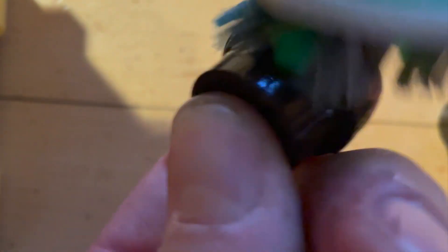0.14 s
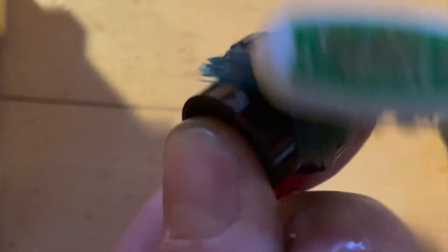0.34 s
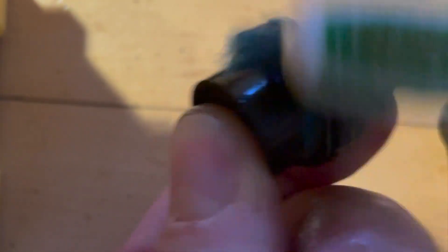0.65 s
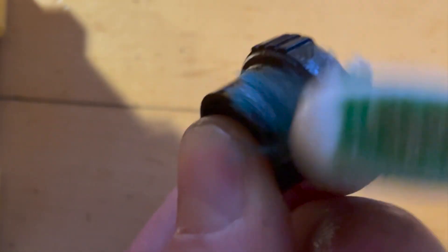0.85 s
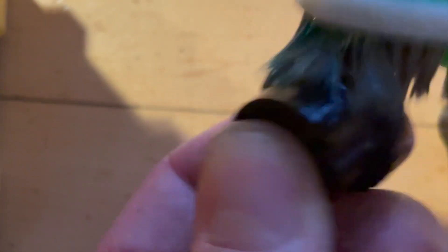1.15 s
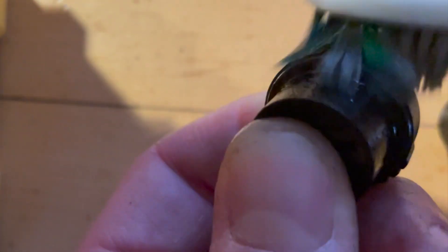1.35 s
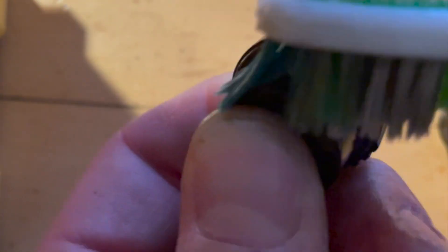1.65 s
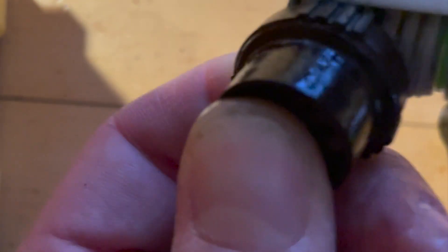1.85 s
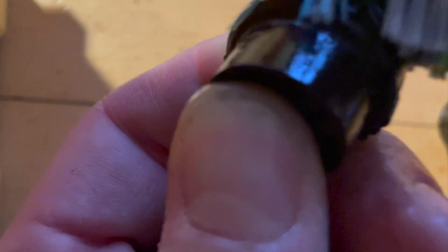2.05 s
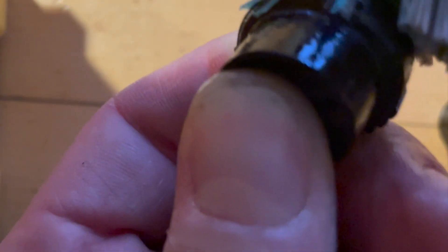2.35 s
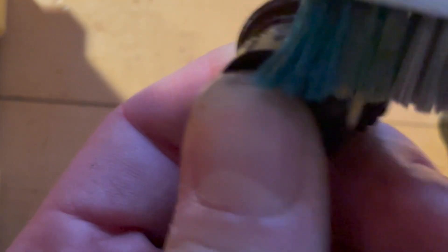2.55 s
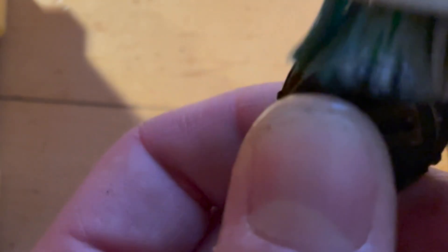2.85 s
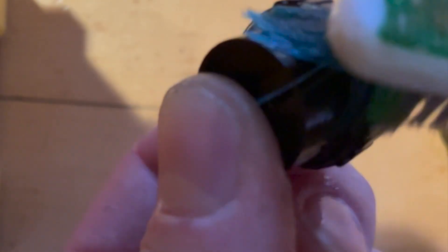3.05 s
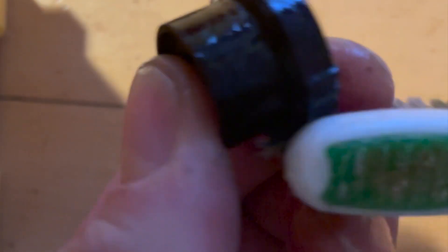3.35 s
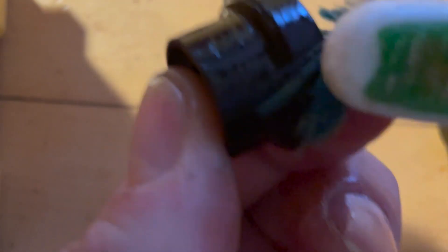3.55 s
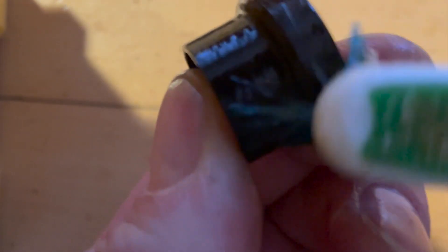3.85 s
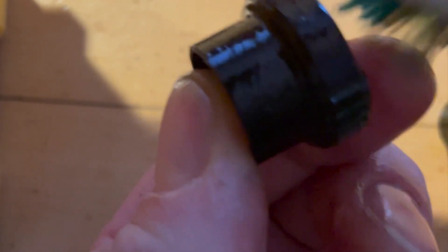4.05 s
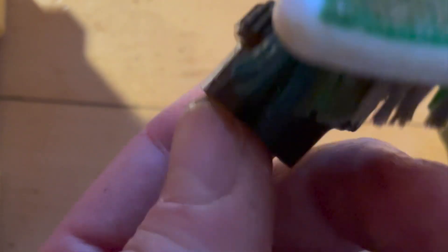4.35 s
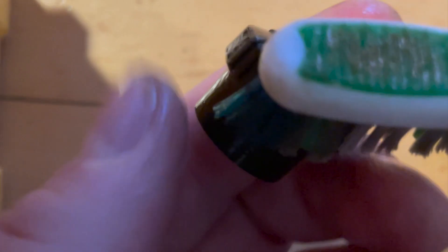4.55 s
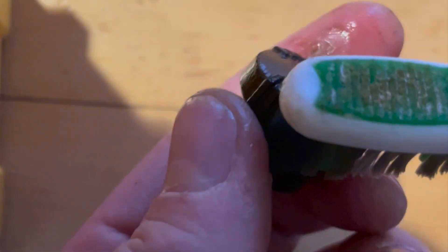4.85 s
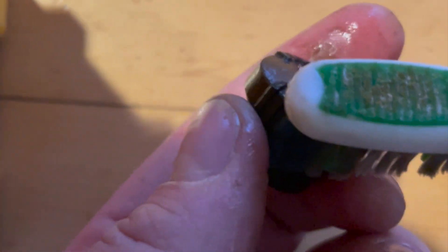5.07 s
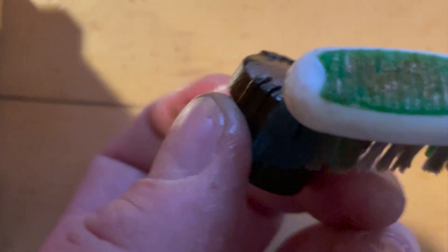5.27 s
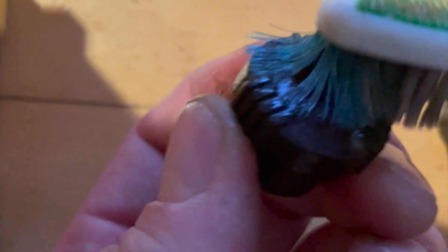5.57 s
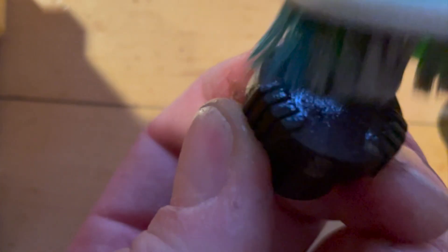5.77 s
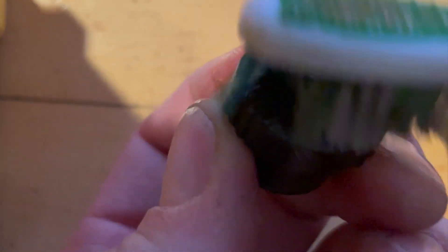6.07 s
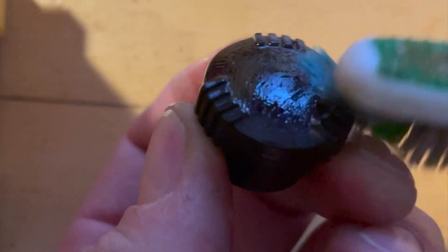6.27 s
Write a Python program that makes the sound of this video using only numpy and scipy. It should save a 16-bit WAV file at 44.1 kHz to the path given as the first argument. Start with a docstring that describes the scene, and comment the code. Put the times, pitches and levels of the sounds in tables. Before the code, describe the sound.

Close, dry scrubbing of a small wet plastic knob with an old toothbrush, in a quiet indoor room with faint low electric hum. From 0 to 0.8 s quick strokes of roughly a tenth of a second follow one another, fizzy and raspy. From 0.8 to 1.7 s they are hardest and brightest, with sharp bristle snaps and small knocks. Around 1.7-2.4 s a grip shift rumbles and strokes become short, separate flicks. From 2.4 to 3.1 s fuller scrubbing returns, strongest near 2.8 s. Crisp ticks and loud snaps come at 3.2-3.35 s, then lighter, sparser scratches, with a softer swish near 4 s. From 4.2 to 5.2 s brushing almost vanishes; fingers roll the knob with dull bumps at 4.5, 4.95 and 5.25 s. From 5.3 s steady strokes resume, with a sharp snap near 5.47 s, longer sweeps after 6 s and a last snap at 6.3 s.

```python
"""Indoors at a workbench: an old toothbrush scrubs a small wet plastic knob held in the fingers, heard close.
In each stroke bristles stick and flick free: coloured random flicks make the fizz of the tips and the knob's rasp.
Short bursts and rings make tufts tick and snap over its ridges; damped low noise makes the hands rumble.
Brief low wave packets are bumps and knocks; wavering sines and soft noise are a faint electric hum and room air."""
import sys
import numpy as np
from scipy import signal
from scipy.fft import rfft, irfft, next_fast_len
from scipy.io import wavfile
from scipy.ndimage import uniform_filter1d

SR = 44100
rng = np.random.default_rng(int(sys.argv[2]) if len(sys.argv) > 2 else 0)


def bounce(signal):
    """Save signal as a 16-bit WAV file at the path given by the first command-line argument."""
    frames = np.transpose(np.atleast_2d(signal))
    limited = np.clip(frames, -1, 1)
    pcm = np.round(limited * 32767).astype(np.int16)
    wavfile.write(sys.argv[1], SR, pcm)


N = 282681

# Brush strokes. Each row: start in seconds, length in seconds, hardest moment as a share of the length (0-1),
# fizz of the bristle tips in dB before trim, rasp of the knob in dB before trim.
STROKES = [(0, 0.097, 0.8, -40, -41.5), (0.101, 0.14, 0.88, -38, -40.5), (0.269, 0.075, 0.28, -43.5, -41.5),
           (0.348, 0.037, 0.6, -44.0, -44), (0.427, 0.12, 0.81, -40, -40.5), (0.582, 0.11, 0.79, -37, -37),
           (0.722, 0.095, 0.6, -38.5, -41.5), (0.844, 0.071, 0.66, -34, -34.5),
           (0.949, 0.096, 0.52, -35.5, -39), (1.073, 0.091, 0.77, -35.0, -37.5),
           (1.175, 0.1, 0.36, -34.5, -37.5), (1.303, 0.054, 0.5, -30.0, -34),
           (1.391, 0.076, 0.5, -32, -38.0), (1.496, 0.06, 0.6, -31, -35), (1.594, 0.051, 0.1, -31.5, -36.5),
           (1.667, 0.127, 0.15, -35.5, -38.0), (1.775, 0.053, 1, -48, -48.5), (1.972, 0.049, 0, -35, -40),
           (2.045, 0.051, 0.95, -45.5, -50), (2.127, 0.049, 0.75, -43, -49),
           (2.315, 0.043, 0.97, -44, -50.5), (2.406, 0.073, 0.51, -35, -38.5),
           (2.477, 0.09, 0.39, -42, -43), (2.567, 0.086, 0.82, -37, -40.5), (2.673, 0.13, 0.39, -39.0, -42),
           (2.801, 0.067, 0.67, -31.5, -37), (2.882, 0.11, 0.23, -39.5, -42),
           (2.993, 0.096, 0.18, -44.5, -51), (3.092, 0.086, 0.9, -50.5, -50),
           (3.176, 0.095, 0.29, -36.5, -37), (3.306, 0.026, 0.96, -36.5, -34.5),
           (3.374, 0.045, 0.53, -48.5, -53), (3.451, 0.041, 0.62, -38, -43),
           (3.517, 0.019, 0.92, -41.5, -40), (3.593, 0.048, 0.13, -42.5, -47.5),
           (3.658, 0.064, 0.2, -58.5, -62.0), (3.778, 0.1, 0.35, -47.5, -49.5),
           (3.913, 0.14, 0.61, -38, -42.5), (4.141, 0.091, 0.35, -49, -45.5), (4.261, 0.09, 0.6, -58, -57),
           (4.377, 0.12, 0.33, -55.5, -55.5), (4.532, 0.116, 1, -62.5, -71.0),
           (4.732, 0.09, 0.7, -63.5, -64), (5.111, 0.051, 0.74, -54.5, -58), (5.309, 0.034, 0.65, -47, -49),
           (5.363, 0.12, 0.92, -38.5, -41), (5.511, 0.063, 0.04, -41.5, -45.5),
           (5.578, 0.12, 0.62, -40.5, -42.5), (5.73, 0.12, 0.52, -33.5, -37.5),
           (5.884, 0.054, 1, -39, -39.5), (5.93, 0.13, 0.6, -41.5, -42), (6.058, 0.19, 0.54, -37, -39),
           (6.238, 0.18, 0, -38, -40)]
# Tufts snapping over a ridge. Each row: time in seconds before a common delay, peak in dB before trim,
# clack of the knob relative to the peak in dB before trim, ring likewise in dB before trim.
SNAPS = [(0.3882, -31, -18, -18), (0.5265, -41, -26, -21), (0.6513, -21, -15, -6), (0.6777, -21, -21, -31),
         (0.706, -25, -10.5, -33), (0.8517, -19, -27, -15), (0.9197, -18.5, -11, -18),
         (0.9486, -22, -14, -9), (1.1063, -16, -36, -15), (1.2158, -15.5, -19, -19),
         (1.3119, -11.5, -32, -24), (1.4178, -12, -16, -38), (1.5324, -18.5, -39, -11),
         (1.593, -20, -30, -19), (1.6837, -17, -34, -14), (1.7866, -19.5, -5, -8), (1.9736, -27, -25, -27),
         (1.9918, -15, -26, -41), (2.1948, -20, -19.5, -21), (2.2662, -27.5, -29, -24),
         (2.304, -21, -38, -26), (2.353, -22, -31, -16), (2.377, -29, -25, -26), (2.4248, -22, -12.5, -18),
         (2.509, -20, -19.5, -18), (2.634, -16.5, -25, -9.5), (2.7507, -22, -21, -9), (2.83, -25, -28, -12),
         (2.861, -20, -30, -5), (3.1831, -22, -32, -23), (3.2096, -16, -20.5, -22),
         (3.3123, -15, -23, -3.5), (3.3296, -10.5, -29, -18), (3.4797, -28, -34, -5),
         (3.5308, -26, -19, -17), (3.5788, -31, -27, -10), (4.126, -31.5, -16, -10),
         (4.1832, -20.5, -18.5, -24), (4.2151, -27, -19, -27), (4.2704, -46.5, -1.5, -20),
         (4.3264, -26.5, -24, -35), (4.4155, -31, -32, -35), (4.546, -38, -14, -12), (4.963, -51.5, -1, 6),
         (5.4661, -11, -24.5, -18), (5.8373, -19.5, -13.5, -8), (5.9125, -18, -25, -18),
         (6.3006, -13, -34, -16)]
# Bumps and knocks of brush and fingers on the knob. Each row: centre in seconds, peak in dB before trim,
# pitch in Hz, length in seconds.
BUMPS = [(0.656, -28.5, 410, 0.0017), (.897, -31.5, 129, 0.01), (1.113, -32, 170, .0097),
         (1.229, -29.5, 330, .006), (1.336, -33.5, 726, 0.0013), (1.345, -33.5, 198, 0.0075),
         (1.42, -29.5, 230, 0.0075), (1.598, -33.5, 556, 0.0031), (1.603, -26, 200, 0.0033),
         (1.79, -34, 1530, 0.00049), (1.791, -31, 168, 0.0081), (2.833, -29, 660, 0.00068),
         (3.335, -25, 139, 0.0062), (4.499, -39, 1440, 0.0011), (4.503, -28.5, 480, 0.0021),
         (4.512, -34, 79, 0.015), (4.948, -26.5, 180, 0.0087), (4.966, -36.5, 1700, 0.00032),
         (5.253, -23, 150, 0.011), (5.332, -31, 514, 0.0012)]
# Fingers shifting grip and rolling the knob. Each row: peak time in seconds, rumble in dB, fading time in seconds.
GRIPS = [(1.691, -32, 0.042), (2.01, -38, 0.021), (4.06, -43.5, 0.25), (4.51, -38, 0.046),
         (4.68, -45, 0.026), (4.95, -40, 0.28), (5.249, -32.5, 0.032), (5.32, -41, 0.046),
         (5.48, -38.5, 0.016), (5.56, -38.5, 0.027), (5.68, -37, 0.042), (5.85, -42, 0.026),
         (5.99, -43, 0.018)]
# Work on the ridges. Each row: time in seconds, ticks relative to the rasp in dB.
RIDGE_TICKS = [(0, -17), (.55, -13), (.66, -12.5), (1.2, -13), (1.35, -9.5), (1.66, -21), (1.73, 0),
               (1.79, -8), (1.87, -11.5), (2.45, -16), (3.1, -7), (3.2, -3), (3.55, -7.5), (3.65, -14),
               (4.2, -11), (4.3, -13), (5.4, -6), (6.41, -15.5)]
# Colours of bristle tips, rubbed knob, struck knob, working hands, gripping fingers and room air.
# Each row: frequency in Hz, relative density in dB per Hz; overall power is normalised.
FIZZ_COLOUR = [(7400, -2), (8150, 4.5), (8850, 2), (9250, 10), (9800, -2.5), (10250, 6.5), (10800, 1),
               (11350, 5.5), (11900, -3), (12500, 5), (13100, -12), (14100, -4), (15700, -4), (16300, -52)]
RASP_COLOUR = [(300, 1.5), (500, -2), (950, 0), (1200, -3), (1600, -1.5), (2200, -5.5), (3000, 0.5),
               (3550, 3.5), (4450, -4), (5200, 0), (5900, 0.5), (6600, -3.5), (7500, 1), (8000, 4.5)]
CLACK_COLOUR = [(300, 8.5), (900, 4.5), (1550, 4.5), (2200, 3), (3200, -11), (4400, -8), (5800, 2),
                (7600, -5)]
WORK_COLOUR = [(20, -26), (40, -5), (70, 1.5), (115, -3), (180, -3), (300, -9.5), (450, -23), (700, -22),
               (1200, -27)]
GRIP_COLOUR = [(20, -24), (45, -3.5), (75, 9.5), (115, -0.5), (185, -6.5), (300, -18.5), (600, -34.5)]
ROOM_COLOUR = [(20, -1), (60, -2), (150, -2), (300, -4), (500, -10.5), (900, -24), (2000, -27), (5000, -37),
               (16000, -43)]
# Hum of an electric appliance. Each row: frequency in Hz, rms in dB before waver.
HUM = [(59.5, -53.5), (122, -56.5), (246.3, -52), (300, -101), (380, -69.5)]
# Level between the two microphone ports. Each row: frequency in Hz, left minus right in dB.
PORT_BALANCE = [(60, -0.5), (270, -0.5), (520, -5.5), (1000, -5), (1250, -5), (2100, -5.5), (3400, -9.5),
                (5900, -6.5), (7200, -4), (8000, 0)]
# Phase between the ports. Each row: frequency in Hz, lead of the left in radians.
PORT_PHASE = [(100, 0), (350, -.3), (500, -.9), (700, -2.8), (1000, -3.3), (1350, -5.2), (2100, -6.2),
              (3000, -6.7), (6000, -6.8), (7300, -6.1), (7750, -3.3), (8850, -3), (9900, -.9), (10600, 0),
              (11900, .75), (12900, 3), (13900, 3.6), (14300, 5.8), (15000, 6.2)]
# Likeness of the ports. Each row: frequency in Hz, share of power common to both (0-1).
PORT_LIKENESS = [(60, 0.95), (270, 0.69), (550, 0.39), (1100, .35), (1700, 0.58), (3500, 1), (6100, 0.57),
                 (7400, 1), (8200, 0.97), (9800, 1), (10800, 0.79), (12300, 1), (14200, 0.46),
                 (15300, 0.37)]

SIZE = next_fast_len(N + 8192)  # padded transform length
HZ = np.maximum(np.arange(SIZE // 2 + 1) * SR / SIZE, 1)
TIME_S = np.arange(N) / SR

SWELL_DB, EASE_DB = 9, 8  # drop from the hardest point to either end of a stroke
LAND_DB_PER_S, LIFT_DB_PER_S = 537, 752
CREEP_FIZZ_DB, CREEP_RASP_DB = -71.5, -71  # between strokes, before trim
TICKS_PER_S_AT_UNIT_EFFORT, TUFT_DB = 600, 2
TILT_HZ, TILT_WANDER_DB, TILT_CHANGES_PER_S = 2170, 1, 31
HANDS_REST_DB, HANDS_OVER_RASP_DB, HANDS_LAG_S = -52, -3, 0.035
GRIP_RISE_S = 0.01
ROOM_DB = -55.5
CUTOFF_HZ = 15900


def from_db(db):
    """Decibels to gain."""
    return 10 ** (np.asarray(db) / 20)


def rms_one(x):
    """Scale to rms 1."""
    return x / np.sqrt(np.mean(x ** 2) + 1e-20)


def over_hz(points):
    """Join a table by straight lines on a log-frequency axis."""
    hz, value = np.transpose(points)
    return np.interp(np.log(HZ), np.log(hz), value)


def drift(changes_per_s):
    """Smooth random curve of rms 1: low-passed noise made on a coarse grid."""
    coarse = SIZE // 16
    hz = HZ[:coarse // 2 + 1]
    noise = rfft(rng.standard_normal(coarse))
    slow = irfft(noise / (1 + (hz / changes_per_s) ** 4), coarse)
    return rms_one(np.interp(np.arange(N) * coarse / SIZE, np.arange(coarse), slow))


def colour(x, spectrum):
    """Causal (minimum-phase) filter of unit power gain that falls away outside its table."""
    octaves_below = np.maximum(np.log2(spectrum[0][0] / HZ), 0)
    octaves_above = np.maximum(np.log2(HZ / spectrum[-1][0]), 0)
    gain_db = over_hz(spectrum) - 60 * (octaves_below + octaves_above)
    gain = rms_one(from_db(np.maximum(gain_db, -80)))
    # folding the cepstrum forward in time gives minimum phase
    cepstrum = irfft(np.log(gain), SIZE)
    cepstrum[1:SIZE // 2] *= 2
    cepstrum[SIZE // 2 + 1:] = 0
    return irfft(rfft(x, SIZE) * np.exp(rfft(cepstrum)), SIZE)[..., :N]


def ring(clicks, hz, cycles):
    """Two-pole resonance of about unit power gain that falls 60 dB within so many cycles."""
    radius = np.exp(-np.log(1000) * hz / (cycles * SR))
    b = np.sqrt((1 - radius ** 2) / 2) * np.array([1, 0, -1])
    a = [1, -2 * radius * np.cos(2 * np.pi * hz / SR), radius ** 2]
    return signal.lfilter(b, a, clicks + 1e-18)


def stroke_levels():
    """Fizz and rasp in dB over time: each stroke is an arch of pressure over the creep of resting bristles."""
    power = from_db([[CREEP_FIZZ_DB], [CREEP_RASP_DB]]) ** 2 * np.ones(N)
    for start_s, length_s, hardest, fizz_db, rasp_db in STROKES:
        near = slice(max(int((start_s - 0.1) * SR), 0), int((start_s + length_s + 0.1) * SR))
        t_s = TIME_S[near] - start_s
        hardest = np.clip(hardest, 0.03, 0.97)
        swell = np.clip(1 - t_s / (hardest * length_s), 0, 1) ** 2
        ease = np.clip((t_s / length_s - hardest) / (1 - hardest), 0, 1) ** 2
        arch_db = -SWELL_DB * swell - EASE_DB * ease
        arch_db -= LAND_DB_PER_S * np.maximum(-t_s, 0)
        arch_db -= LIFT_DB_PER_S * np.maximum(t_s - length_s, 0)
        power[:, near] += from_db(arch_db + np.array([[fizz_db], [rasp_db]])) ** 2
    return 10 * np.log10(power)


def flicks(per_s, spread_db):
    """Random slips, most gentle and a few hard; rms 1. Rows: shared by both ports, left only, right only."""
    chance = np.clip(per_s / SR, 1e-4, 1)
    sizes = from_db(spread_db * np.minimum(rng.exponential(1, N), 4))
    slips = rng.random(N) < chance
    # dividing by the root of the chance keeps the power even as the rate changes
    return rms_one(sizes * slips / np.sqrt(chance)) * rng.choice([-1, 1], (3, N))


def ridge_ticks(per_s, low_hz, high_hz, cycles, count=12):
    """Single bristles drop off ridges; each tick rings briefly at one of a set of pitches; rms 1."""
    clicks = flicks(per_s, spread_db=1.5)
    dealt = rng.integers(0, count, N)
    pitches_hz = np.geomspace(low_hz, high_hz, count)
    return rms_one(sum(ring(clicks * (dealt == k), hz, cycles) for k, hz in enumerate(pitches_hz)))


def scrubbing(fizz_db, rasp_db, tip_db, ping_db, knob_db):
    """Harder strokes free more bristles; they let go in tufts, which makes the sound grainy."""
    effort = from_db(0.55 * (fizz_db + 41))
    tufts = rms_one(from_db(TUFT_DB * drift(220) + 1.0 * drift(39)))

    pings = ridge_ticks(per_s=2200 * effort, low_hz=8866, high_hz=16500, cycles=98, count=8)
    tips = tufts * flicks(11000 * effort, spread_db=3.0) + from_db(ping_db) * pings
    fizz = colour(tips * from_db(fizz_db + tip_db + 2.1 * drift(106)), FIZZ_COLOUR)

    rubs = tufts * flicks(5500 * effort, spread_db=0.5)
    rasp = colour(rubs * from_db(rasp_db + knob_db + 0.96 * drift(89)), RASP_COLOUR)
    # duller or brighter as the bristles travel over the knob
    dull = signal.sosfilt(signal.butter(1, TILT_HZ, fs=SR, output="sos"), rasp)
    rasp = rasp + dull * (from_db(TILT_WANDER_DB * drift(TILT_CHANGES_PER_S)) - 1)

    ridge_s, ridge_db = np.transpose(RIDGE_TICKS)
    ticks_db = rasp_db + np.interp(TIME_S, ridge_s, ridge_db)
    ticks_per_s = TICKS_PER_S_AT_UNIT_EFFORT * effort
    ticks = from_db(ticks_db) * ridge_ticks(ticks_per_s, low_hz=1454, high_hz=3680, cycles=22.0)
    return fizz + rasp + ticks


def rumble(spectrum):
    """Low noise levelled by its own power over 40 ms; rms about 1."""
    noise = colour(rng.standard_normal((3, N)), spectrum)
    return noise / np.sqrt(uniform_filter1d(noise ** 2, size=SR // 25) + 0.05)


def hand_rumble(rasp_db):
    """Flesh damps low motion to a dull rumble: faint at rest, lagging the strokes, rising with each grip."""
    keep = np.exp(-1 / (HANDS_LAG_S * SR))
    stroke_power = from_db(rasp_db + HANDS_OVER_RASP_DB) ** 2
    work_power = from_db(HANDS_REST_DB) ** 2 + signal.lfilter([1 - keep], [1, -keep], stroke_power)
    grip = np.zeros(N)
    for peak_s, grip_db, fade_s in GRIPS:
        away = np.maximum((peak_s - TIME_S) / GRIP_RISE_S, (TIME_S - peak_s) / fade_s)
        grip += from_db(grip_db) * np.exp(-away)
    return np.sqrt(work_power) * rumble(WORK_COLOUR) + grip * rumble(GRIP_COLOUR)


def room_tone(waver_db):
    """Hum of sines that waver in level and phase, over dull still air."""
    hum = np.zeros(N)
    for hz, rms_db in HUM:
        level = from_db(rms_db + waver_db * drift(3.0)) * np.sqrt(2)
        hum += level * np.sin(2 * np.pi * hz * TIME_S + 0.44 * drift(11.0))
    air = rng.standard_normal(N) + 0.5 * rng.standard_normal((2, N))  # partly shared by the ports
    return hum + from_db(ROOM_DB) * colour(air, ROOM_COLOUR)


def snap_lead_in(lead_db, lead_s):
    """A tuft scrapes harder and harder just before it snaps: dB added to the fizz over time."""
    tension = np.zeros(N)
    for snap_s, *_ in SNAPS:
        before = slice(max(int((snap_s - 10 * lead_s) * SR), 0), int(snap_s * SR))
        tension[before] += np.exp((TIME_S[before] - snap_s) / lead_s)
    return lead_db * tension


def snaps(fade_s, whip_db, tip_db, knob_db, ring_db, delay_s):
    """A tuft cracks free, its last bristles whip off in a millisecond or two; the knob clacks and rings."""
    tips, knob, rim = np.zeros((3, 3, N))
    t_s = np.arange(SR // 80) / SR
    for snap_s, peak_db, clack_share_db, ring_share_db in SNAPS:
        start = int((snap_s + delay_s) * SR)
        span = slice(start, start + len(t_s))
        burst = from_db(whip_db) * np.exp(-t_s / fade_s) * rng.choice([-1, 1], (3, len(t_s)))
        burst[0, 0] = 1  # the crack itself, shared by both ports
        tips[:, span] += burst * from_db(peak_db + tip_db)
        knob[:, span] += burst * from_db(peak_db + clack_share_db + knob_db)
        rim[0, start] = from_db(peak_db + ring_share_db + ring_db)
    return colour(tips, FIZZ_COLOUR) + colour(knob, CLACK_COLOUR) + ring(rim, hz=3230, cycles=18)


def bumps(bump_db):
    """Damped knocks of brush and fingers: cosines under a short bell (sech) envelope."""
    out = np.zeros((3, N))
    for centre_s, peak_db, hz, length_s in BUMPS:
        t_s = TIME_S - centre_s
        near = np.abs(t_s) < 2 * length_s
        phases = np.vstack([0, rng.uniform(0, 2 * np.pi, (2, 1))])
        wave = np.cos(2 * np.pi * hz * t_s[near] + phases)
        out[:, near] += from_db(peak_db + bump_db) * wave / np.cosh(np.pi * t_s[near] / length_s)
    return out


def at_ports(x):
    """Shared sound reaches each port with its own level and phase; sound scattered by the hands differs."""
    paths = rfft(x, SIZE)
    sides = np.array([[0.5], [-0.5]])  # left, right
    alike = np.clip(over_hz(PORT_LIKENESS), 0, 1)
    direct = np.sqrt(alike) * np.exp(1j * sides * over_hz(PORT_PHASE)) * paths[0]
    scattered = np.sqrt(1 - alike) * paths[1:]
    level = from_db(sides * over_hz(PORT_BALANCE))
    level /= np.sqrt(np.mean(level ** 2, axis=0))
    return irfft(level * (direct + scattered), SIZE)[:, :N]


def scene():
    """Brush and hands close by, the room behind."""
    fizz_db, rasp_db = stroke_levels()
    fizz_db = fizz_db + snap_lead_in(lead_db=4.5, lead_s=0.004)
    close = scrubbing(fizz_db, rasp_db, tip_db=-2.0, ping_db=-4.5, knob_db=-1.14)
    close += hand_rumble(rasp_db)
    close += snaps(fade_s=0.0012, whip_db=-5.0, tip_db=-0.5, knob_db=11.0, ring_db=12.5, delay_s=0.0014)
    close += bumps(bump_db=2.0)
    return at_ports(close) + room_tone(waver_db=2.5)


def record(dry):
    """Steep elliptic low-pass cuts the top."""
    return signal.sosfilt(signal.ellip(12, 0.1, 80, CUTOFF_HZ, fs=SR, output="sos"), dry)


dry = scene()
out = record(dry)
bounce(out)
```